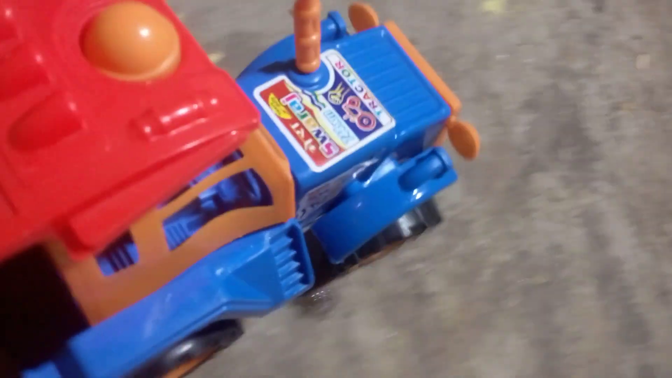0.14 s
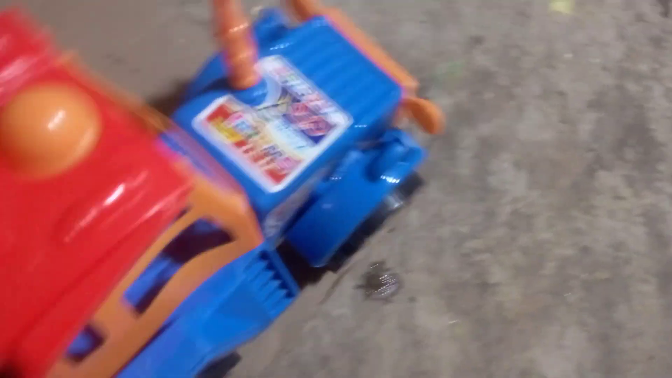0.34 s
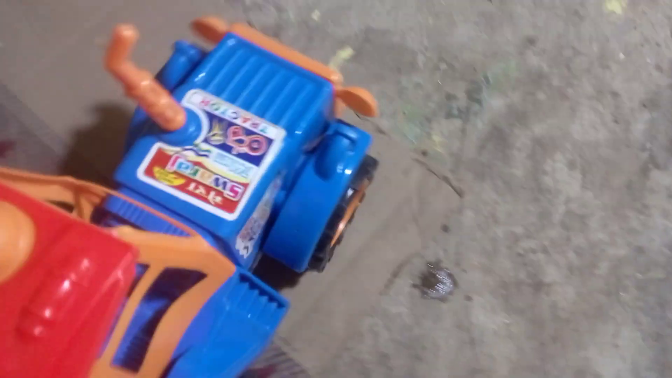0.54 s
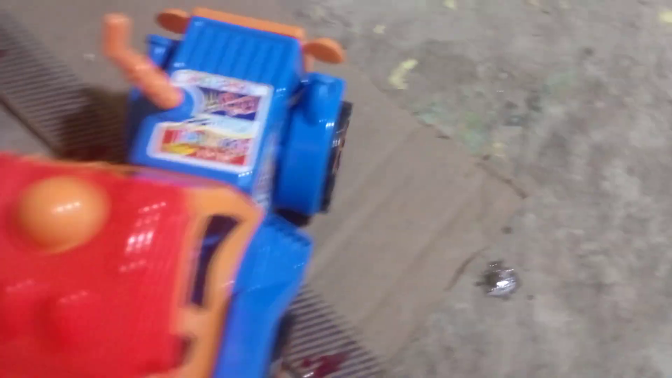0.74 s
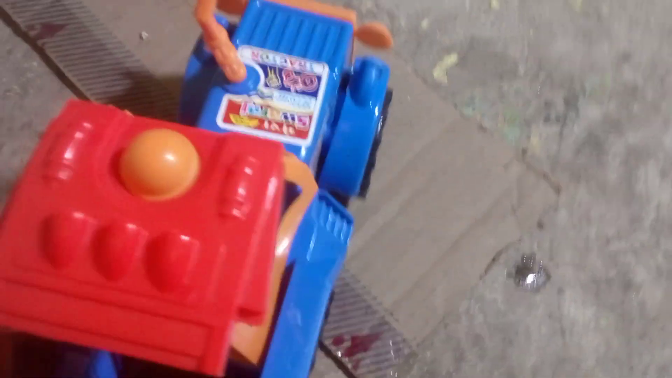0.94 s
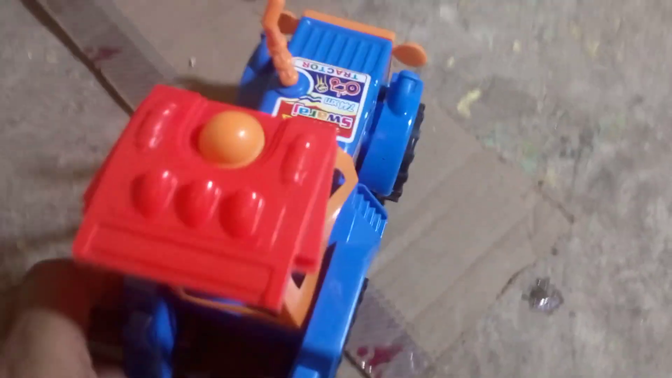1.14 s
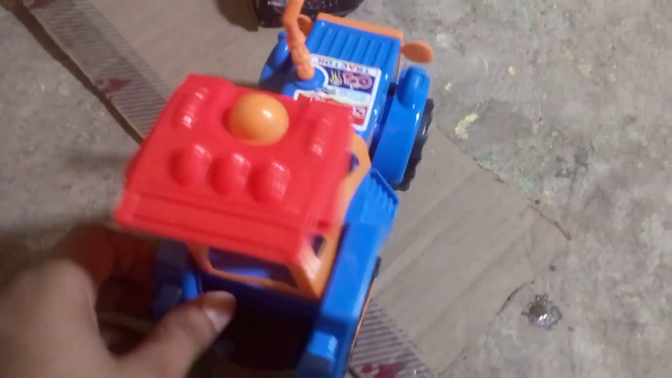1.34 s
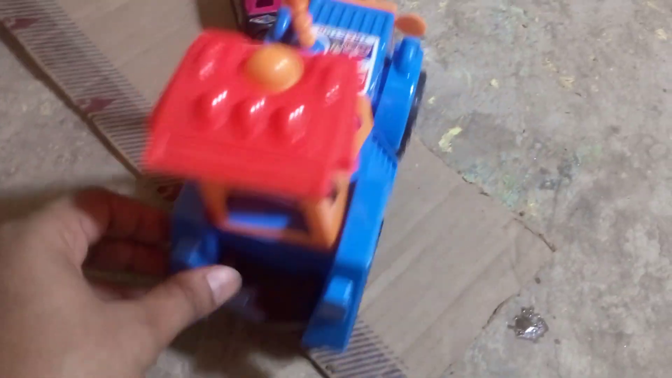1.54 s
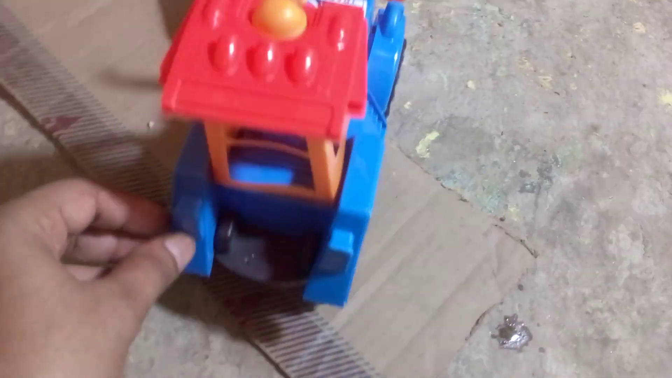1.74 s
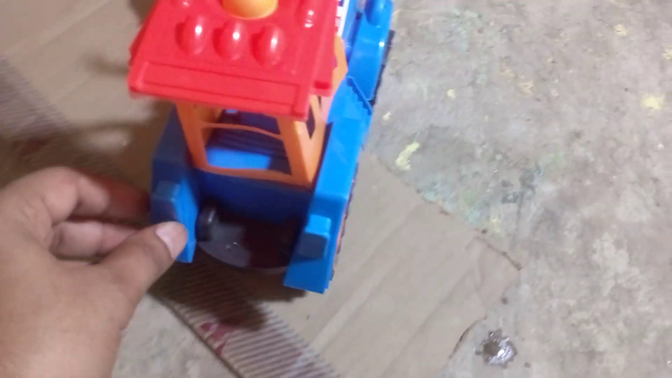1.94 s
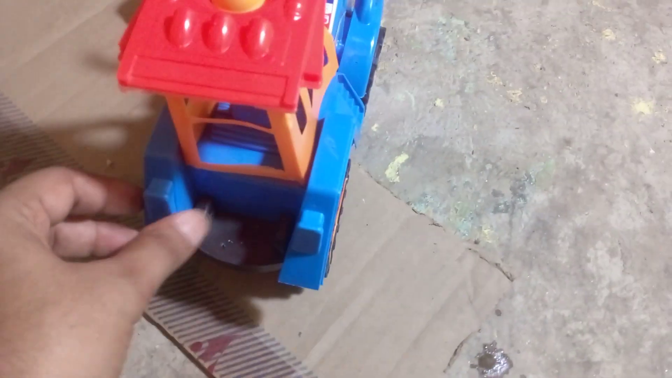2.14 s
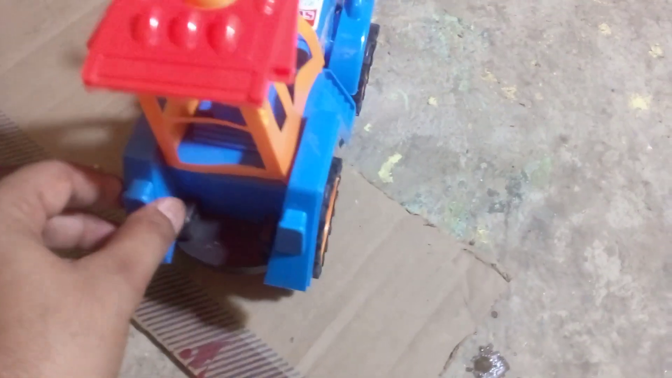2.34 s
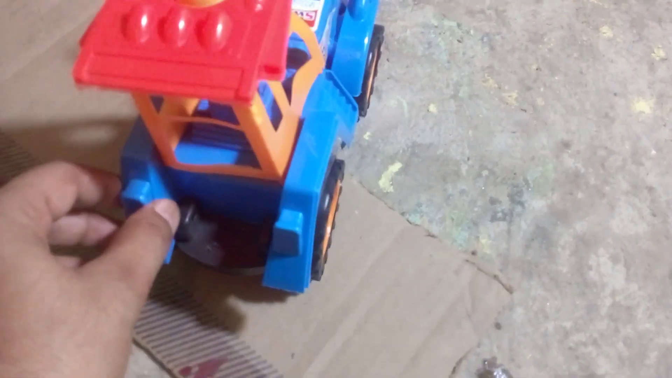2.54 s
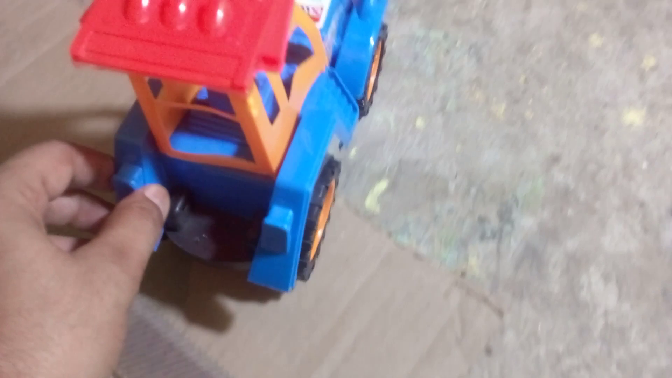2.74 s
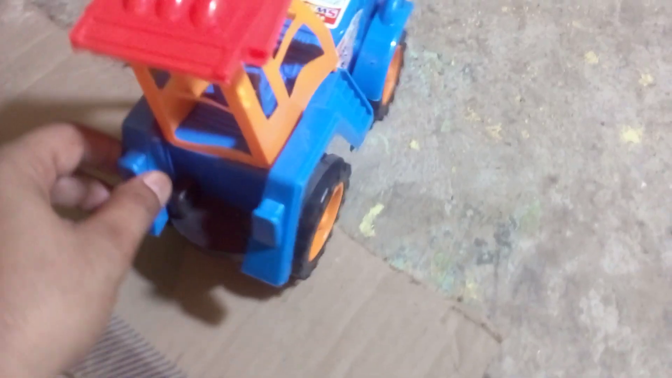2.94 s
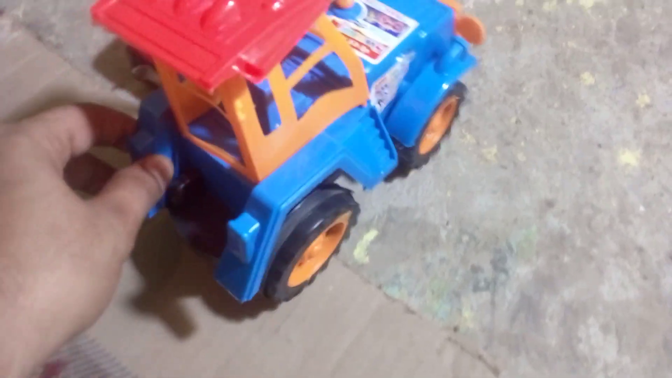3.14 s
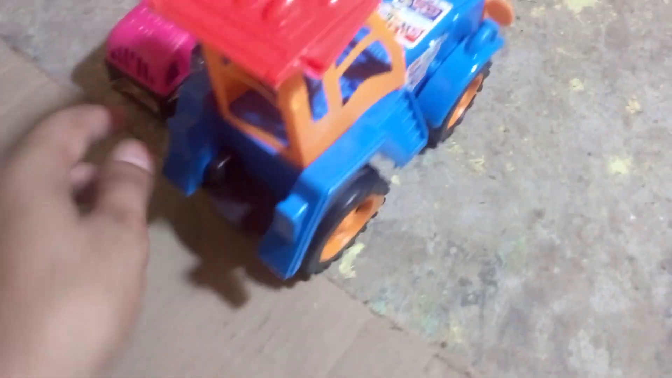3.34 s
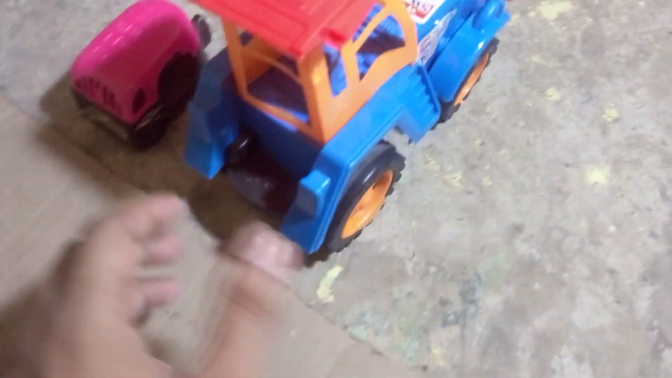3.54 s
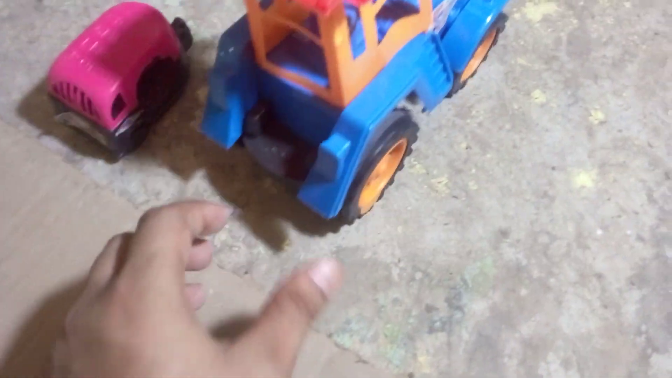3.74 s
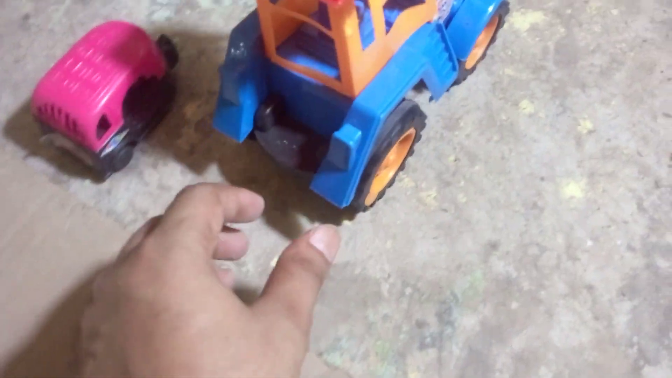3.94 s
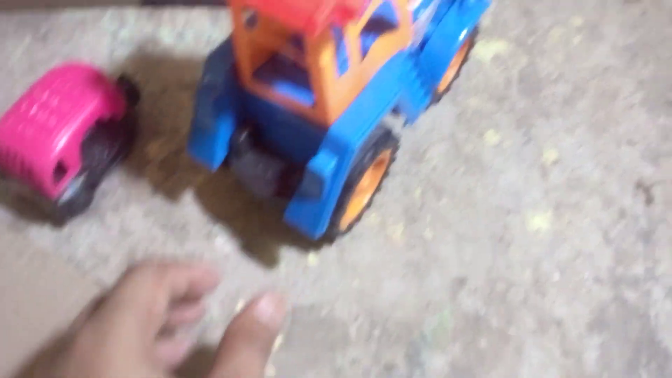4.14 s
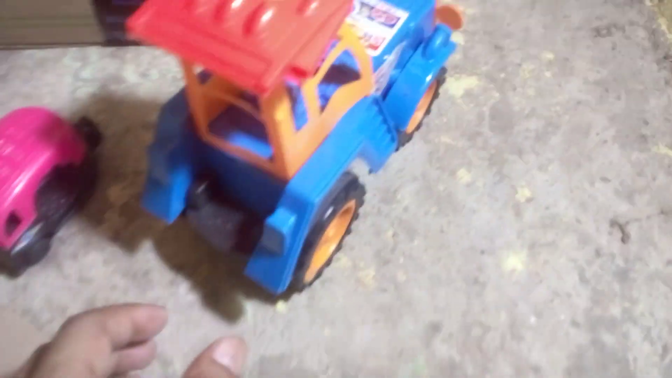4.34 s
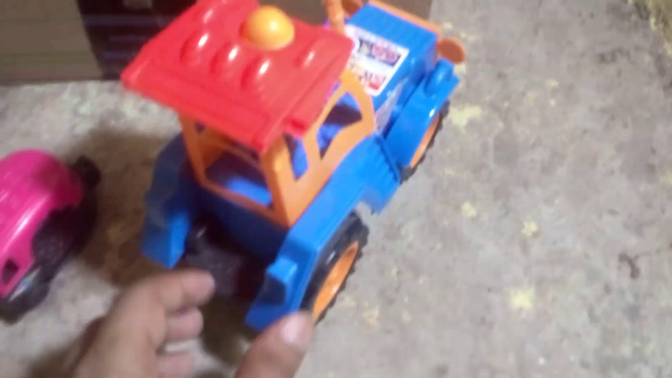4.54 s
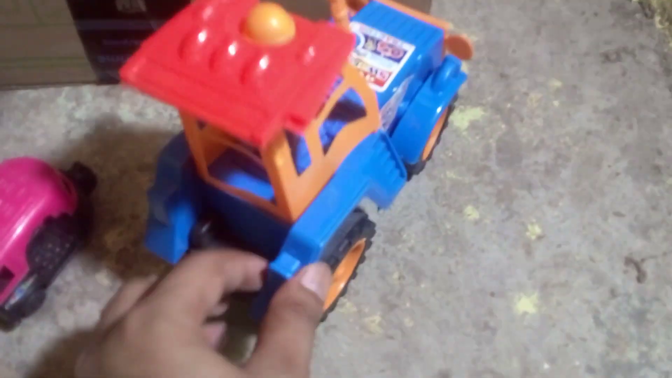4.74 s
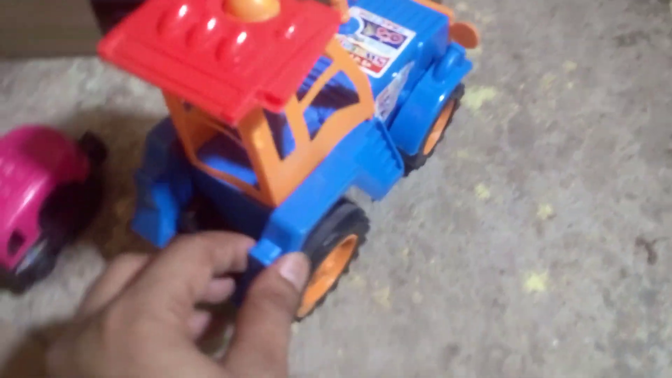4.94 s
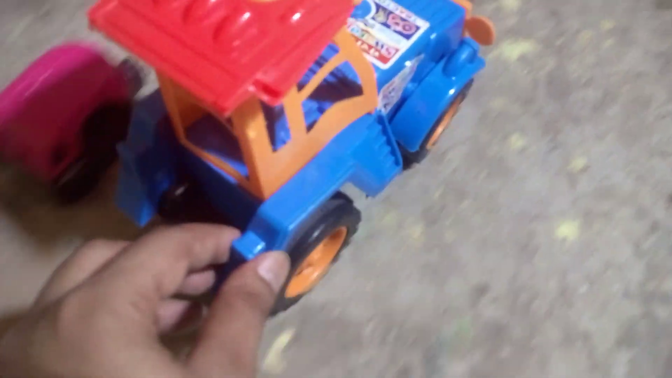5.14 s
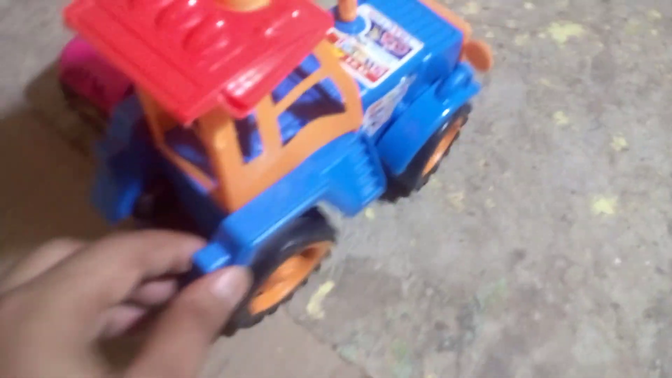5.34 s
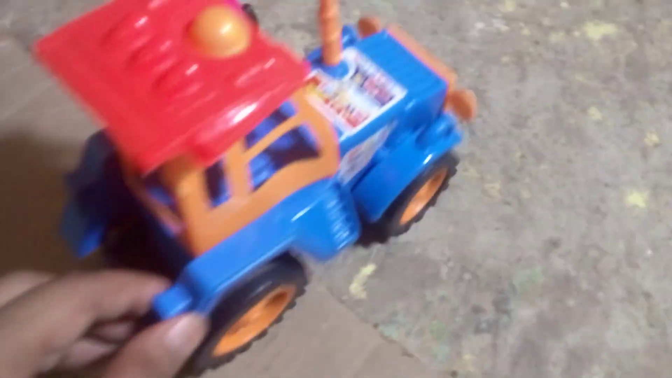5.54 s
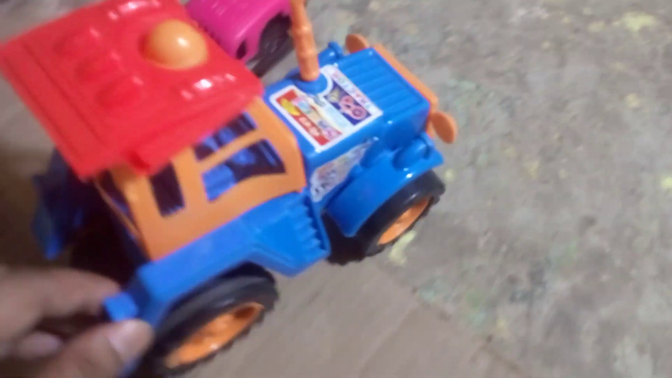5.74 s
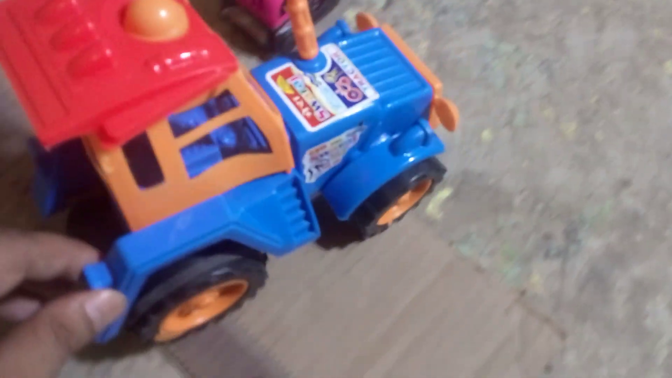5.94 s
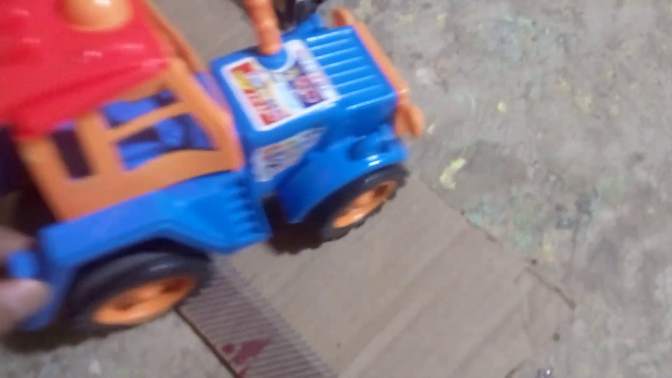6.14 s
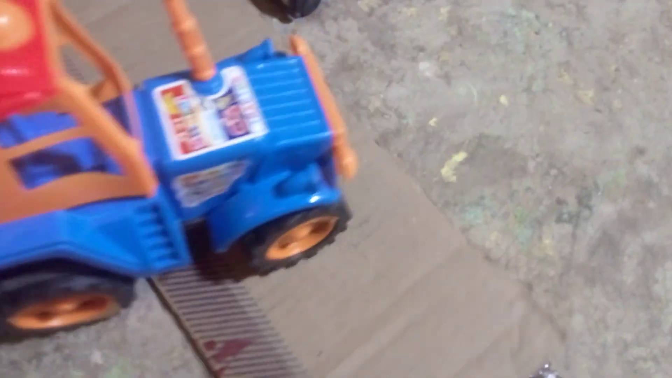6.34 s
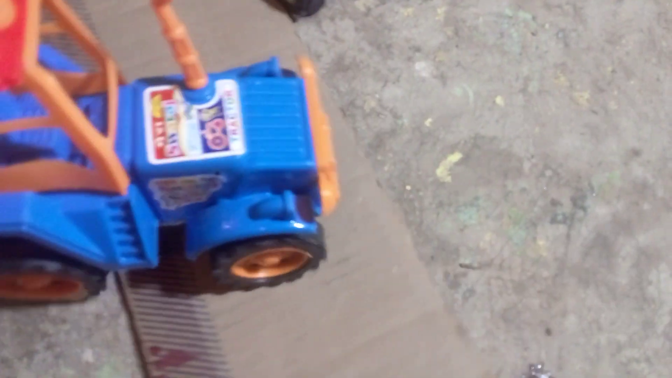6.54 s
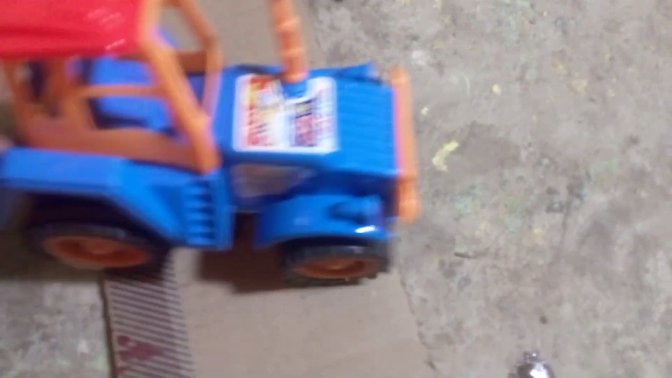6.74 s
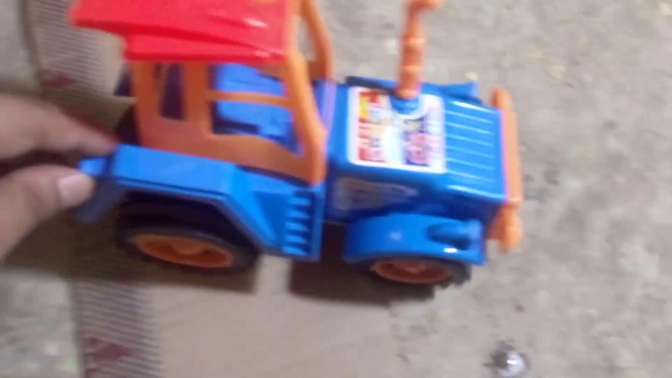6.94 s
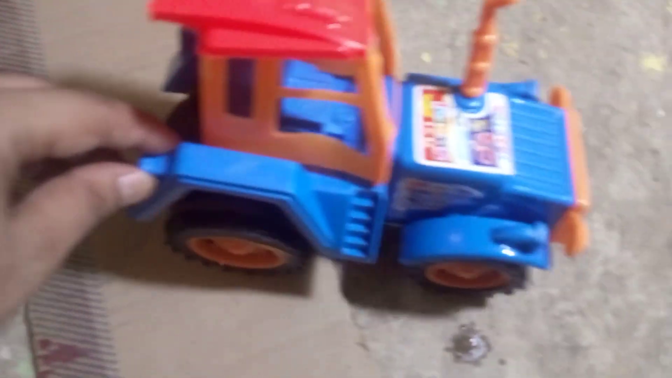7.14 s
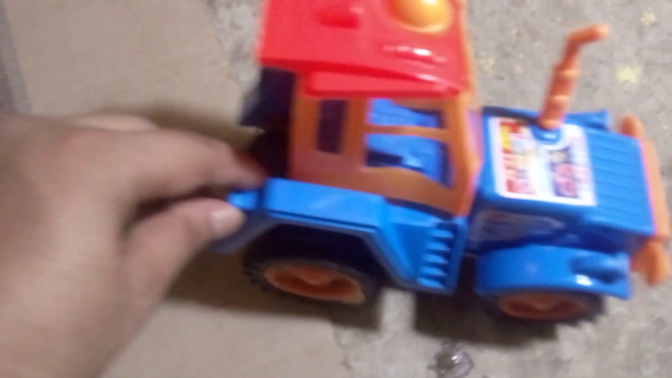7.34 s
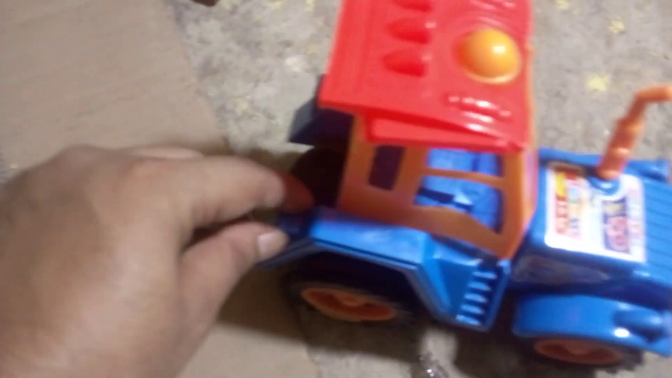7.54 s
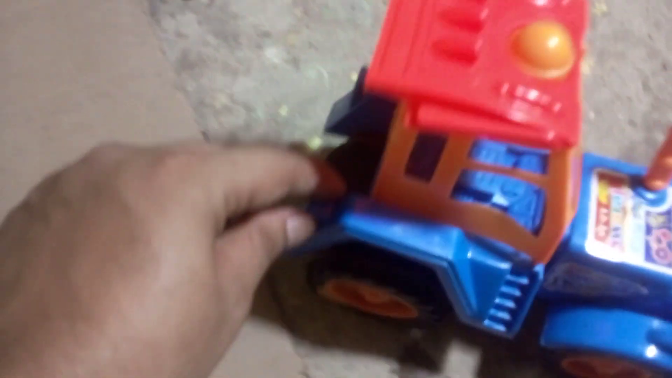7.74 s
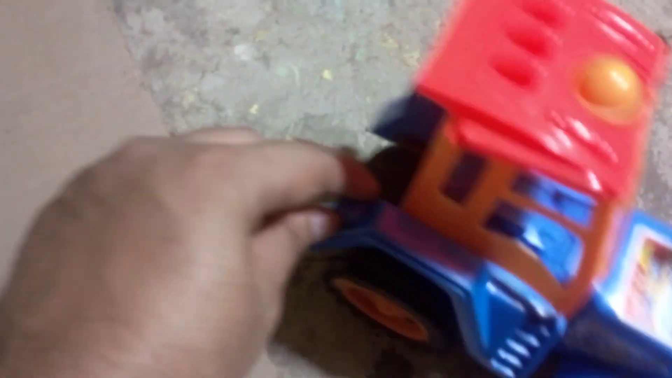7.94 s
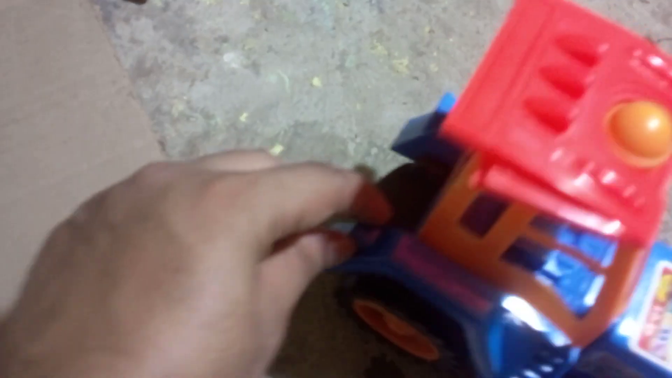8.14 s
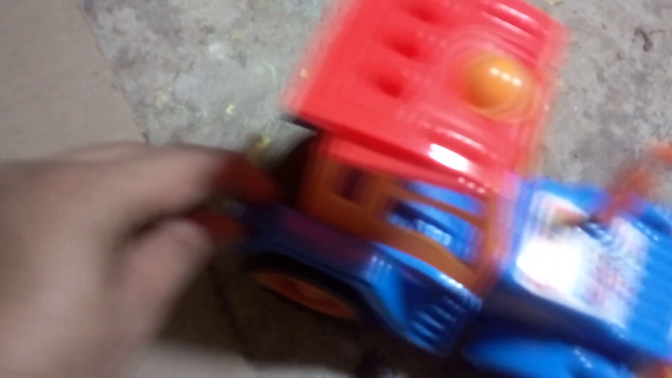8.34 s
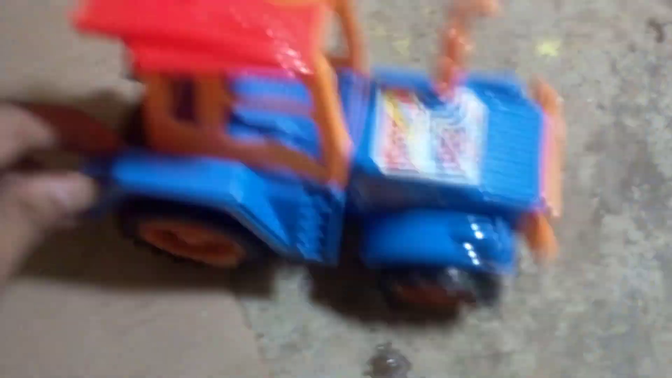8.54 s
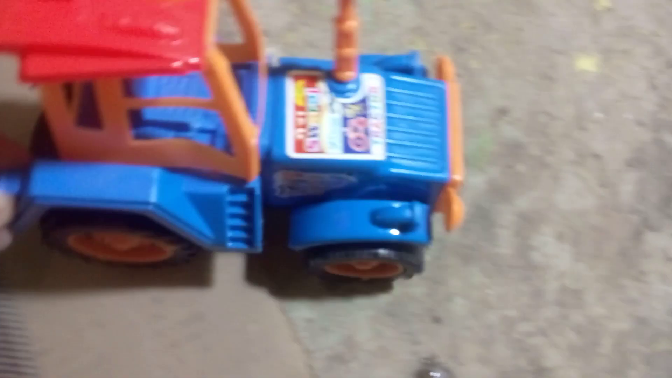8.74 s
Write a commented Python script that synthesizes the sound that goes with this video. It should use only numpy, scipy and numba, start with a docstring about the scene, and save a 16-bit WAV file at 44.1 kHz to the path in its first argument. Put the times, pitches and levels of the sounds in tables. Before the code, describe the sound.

A hollow plastic toy tractor is pushed in fits over rough concrete, close to the microphone in a small hard room with a short echo. From 0 to 0.7 s it rattles briskly, with a hard knock near 0.5, while an engine drones low outside, fading by about 2.3 s. Scattered knocks follow, with a rolling burst near 1.9 and lurching, hollow scrapes from 2.5 to 3.9. Movement thins to a lull from about 4.2; at 4.8 a palm thumps the shell softly and low. A bright grit crack and a cluster of knocks come around 5.3 to 5.8, another knock at 6.4, then fuller, boomier rolling from 6.7 to 7.9 as an engine drones again. A low room boom swells near 8.2 during a short easing, and strong clatter closes from 8.5 to 8.9. Dull air and a wavering motor hum persist.

```python
"""From the start a hollow plastic toy tractor is pushed in fits over rough concrete, heard from close by.
Grit jolts ring its wheels and shell as decaying modes; knocks, lurches and cracking grains punctuate it.
A small hard room answers throughout, under filtered-noise air and a sine hum that swells and sinks.
Engine notes, gliding sines, drone outside in the first seconds; after a lull near 4.8 s a palm thumps the toy.
Rolling returns, an engine drones again from about 6.6 s, and a low room boom swells near 8.2 s."""
import sys
import numpy as np
from scipy import signal
from scipy.fft import rfft, irfft, next_fast_len
from scipy.io import wavfile
from scipy.ndimage import uniform_filter1d
from numba import njit

SR = 44100
rng = np.random.default_rng(int(sys.argv[2]) if len(sys.argv) > 2 else 0)


def wrap_up_sound(samples):
    """Save the sound to the file named by the first command line argument, as 16-bit audio."""
    columns = np.atleast_2d(samples).T
    # keep every value between -1 and 1, then stretch to whole-number steps
    tamed = np.clip(columns, -1, 1)
    steps = np.round(tamed * 32767).astype(np.int16)
    wavfile.write(sys.argv[1], SR, steps)


def to_linear_factor(level_db):
    """Convert decibel levels (scalar or array-like) to linear amplitude factors."""
    exponent = np.asarray(level_db, float) / 20
    return 10 ** exponent


N = 391166
TIME = np.arange(N) / SR


def unit(x):
    """Normalization: scales a signal to rms 1."""
    return x / np.sqrt(np.mean(x ** 2))


def curves(table):
    """Linear interpolation: one value per sample of each column, with the end values held outside."""
    s, *columns = np.transpose(table)
    return [np.interp(TIME, s, c) for c in columns]


def walk(rate):
    """Slow random modulation: held noise, about rate values a second, smoothed twice to rms 1."""
    hold = int(SR / rate)
    steps = np.repeat(rng.standard_normal(N // hold + 1), hold)
    smooth = uniform_filter1d(uniform_filter1d(steps, hold), hold)
    return unit(smooth[:N])


def colour(x, points):
    """Spectral shaping: a filter through (frequency [Hz], gain [dB]), straight over log frequency."""
    hz, db = np.transpose(points)
    size = next_fast_len(N)
    f = np.maximum(np.arange(size // 2 + 1) * SR / size, 1)
    gain = to_linear_factor(np.interp(np.log(f), np.log(hz), db))
    return irfft(rfft(x, size) * gain, size)[:N]


def highpass(x, hz):
    """High-pass filtering: a steep fourth-order bass cut."""
    return signal.sosfilt(signal.butter(4, hz, "high", fs=SR, output="sos"), x)


# edges between the wheel, shell, panel and grit ranges: (frequency [Hz])
SPLIT_HZ = (1050., 2800., 6800.)


def split(x, k):
    """Complementary band-splitting: range k of the four, lowest first; the ranges sum to x."""
    def above(j):
        if j == 0:
            return x
        if j > len(SPLIT_HZ):
            return 0
        # filtered forth and back, so that the differences cancel cleanly
        forth = highpass(x, SPLIT_HZ[j - 1])
        return highpass(forth[::-1], SPLIT_HZ[j - 1])[::-1]
    return above(k) - above(k + 1)


def impulses(s, size):
    """Impulsive excitation: clicks of given sizes at given times."""
    return np.bincount(np.clip((s * SR).astype(int), 0, N - 1), size, N)


def burst(x, decay_s):
    """Exponential decay: each click becomes a short puff of noise."""
    envelope = signal.lfilter([1], [1, -np.exp(-1 / (decay_s * SR))], np.abs(x))
    return envelope * rng.standard_normal(N)


@njit
def glide(x, hz, r):
    """Damped resonance: a rotating, shrinking phasor whose pitch may move on every sample."""
    y, z = np.empty(len(x)), 0j
    for i in range(len(x)):
        z = z * r * np.exp(2j * np.pi * hz[i] / SR) + x[i] + 1e-18
        y[i] = z.imag
    return y


def ring(x, hz, t60, wander=0.):
    """Modal ringing: an impulse of 1 starts a sine of peak 1; pitch wanders as load and contact shift."""
    return glide(x, hz * (1 + wander * walk(14)), np.exp(-np.log(1000) / (t60 * SR)))


def tone(hz, db):
    """Phase accumulation: a sine on a moving pitch, level in dB rms."""
    return np.sqrt(2) * to_linear_factor(db) * np.sin(2 * np.pi * (np.cumsum(hz) / SR + rng.uniform()))


# spectrum of the steady background air: (frequency [Hz], relative density [dB per Hz])
AIR = [(24, -43), (40, -17), (101, -19.5), (130, -22.5), (249, -35.5), (276, -30.5), (1680, -46),
       (16000, -77)]


def air():
    """Broadband noise: random noise shaped by a falling spectrum, its level drifting gently."""
    level_db = -44.5 + 1.0 * walk(3.69)
    return to_linear_factor(level_db) * unit(colour(rng.standard_normal(N), AIR))


# room boom stirred by the traffic: (time [s], level before wavering [dB])
BOOM = [(0, -47), (5, -50.5), (7.8, -48.5), (8.2, -39.5), (8.87, -46)]


def boom():
    """Low room resonance: a sine near 96.5 Hz that wavers in pitch and level."""
    hz = 96.5 * (1 + 0.013 * walk(5.5))
    level_db, = curves(BOOM)
    return tone(hz, level_db + 4.23 * walk(7.6))


# engines outside, one table each: (time [s], pitch [Hz], level before wavering [dB])
ENGINES = [
    [(0, 73.7, -34), (.35, 74, -32.5), (.75, 75, -43), (2.1, 71.05, -43.5)],
    [(.8, 58, -42), (1.2, 65.06, -41.5), (2.3, 65.5, -46)],
    [(6.7, 58, -44), (7.1, 61.6, -43.5), (7.9, 66.4, -35.5), (8.35, 64.9, -40), (8.87, 66.2, -49)],
]


def engines():
    """Harmonic radiation: low engine notes with their octaves get through the walls."""
    out = 0
    for table in ENGINES:
        hz, db = curves(table)
        start_s, end_s = table[0][0], table[-1][0]
        fade = np.clip(np.minimum(TIME - start_s, end_s - TIME) / 0.14 + 1, 0, 1)
        db = db + 1.3 * walk(10.0)
        out = out + fade * (tone(hz, db) + tone(2 * hz, db - 13))
    return out


# motor hum: (time [s], level of the fundamental [dB])
HUM = [(0, -42), (1.9, -55), (2.8, -42), (4.4, -52), (5.9, -40), (8.87, -49)]


def hum():
    """Periodic vibration: a motor nearby hums on a steady fundamental and a weaker octave."""
    hz = np.full(N, 53.6)
    level_db, = curves(HUM)
    return tone(hz, level_db) + tone(2 * hz, level_db - 13.0)


# hand meets the toy: (level [dB], frequency [Hz], t60 [s]) of the lowest mode
THUD = (-19.5, 136, 0.071)


def thud():
    """Cavity resonance: a soft palm makes contact twice and thumps the hollow toy low and short."""
    db, hz, t60 = THUD
    start_s = 4.826
    push = impulses(np.array([start_s, start_s + 0.017]), to_linear_factor([db - 8, db]))
    low = ring(push, hz, t60)
    upper = to_linear_factor(-4.0) * ring(push, 3.7 * hz, t60 / 2)
    middle = to_linear_factor(-7.0) * ring(push, 2.57 * hz, t60 / 2)
    return low + upper + middle


# grit cracking under a wheel: (time [s], puff level before band-splitting [dB])
TICKS = [(0.2075, -30), (0.595, -21), (1.181, -24), (1.7585, -24.5), (3.428, -26), (3.9374, -29.5),
         (4.839, -22), (5.378, -15.5), (6.4664, -23.5), (6.564, -26), (6.828, -26), (7.9605, -29.5)]


def ticks():
    """Brittle fracture: single grains crack in a bright puff with a little of the panels in it."""
    s, db = np.transpose(TICKS)
    puff = burst(impulses(s, to_linear_factor(db)), 0.0037)
    grit = len(SPLIT_HZ)
    return split(puff, grit) + to_linear_factor(-1) * split(puff, grit - 1)


# lowest modes of the wheels: (frequency [Hz], relative level [dB], undamped t60 [s])
WHEELS = [(590, -17, 0.033), (682, -6, 0.056), (831, -5, 0.047), (927, -8, 0.074)]
# modes of the shell: (frequency [Hz], relative level [dB], undamped t60 [s])
SHELL = [(1176.6, -2, 0.055), (1250, 0, 0.029), (1310, -1.5, 0.06), (1590, 3, 0.018), (2134, -5, 0.042),
         (2544, 5, 0.01), (2746, -6.5, 0.053), (3030, 6.5, 0.012), (3510, 1, 0.015), (3985, -1.5, 0.019)]
# filter for plastic on grit, in knocks and rolling: (frequency [Hz], gain [dB])
SCRAPE = [(200, -25.5), (520, -42), (650, -14), (1020, -14.5), (1260, -11.5), (1900, -9.5), (4190, -11.5),
          (5800, -17), (7060, -33.5), (10500, -26.5), (15500, -30.5)]
# knocks, which also start rattles in the rolling: (time [s], relative peak [dB], strongest ring [Hz])
KNOCKS = [(0.135, 1.5, 1870), (0.317, 2.5, 1480), (0.331, -4.5, 1470), (0.481, 8.5, 1240), (0.5, -3, 1310),
          (0.635, 1.5, 1470), (0.677, -8.5, 4030), (0.87, -16.5, 2023), (0.998, -15, 2320),
          (1.135, -4, 1190), (1.338, -5, 1300), (1.523, -4.5, 1330), (1.691, -0.5, 1380),
          (1.831, -2.5, 1280), (1.952, -8.5, 1000), (2.119, -13.5, 2640), (2.513, -4.5, 1750),
          (2.68, -11.5, 1300), (2.706, -10.5, 1340), (2.727, -10, 1300), (2.987, -3.5, 1250),
          (3.017, -7.5, 1350), (3.06, -9, 1250), (3.232, -9.5, 1200), (3.269, -5, 1270), (3.348, 0, 1300),
          (3.712, -7.5, 1670), (3.857, -2.5, 1330), (4.098, -16, 1320), (4.144, -10.5, 1470),
          (4.167, -11, 1470), (4.208, -15.5, 1650), (4.36, -25, 3500), (4.805, -30, 2940),
          (4.943, -10.5, 2570), (5.329, -1, 2750), (5.346, -1, 1310), (5.353, 0, 1310), (5.453, -7.5, 1310),
          (5.612, 1, 1300), (5.817, 2.5, 1250), (5.84, -2.5, 690), (6.39, 0.5, 700), (6.526, -10.5, 2500),
          (6.546, -11, 3950), (6.75, -7.5, 4150), (7.115, 0, 945), (7.153, -5.5, 1290), (7.306, -11, 2400),
          (7.417, -3, 1200), (7.613, -4, 1200), (7.758, -7.5, 1740), (7.791, -1, 2490), (7.934, -2.5, 1840),
          (8.133, -8.5, 2250), (8.164, -10.5, 1700), (8.314, -16.5, 2080), (8.606, 2.5, 1440),
          (8.644, 5, 1780), (8.652, 5.5, 1590), (8.668, 1.5, 1590), (8.826, 4, 1680), (8.836, 2.5, 1400)]


def knocks():
    """Impact excitation: a quick run of contacts, the second mostly hardest, rings modes near the struck one."""
    s, peak_db, struck_hz = np.transpose(KNOCKS)
    modes, bounce = WHEELS + SHELL, np.arange(4)
    gap = rng.standard_normal((len(s), len(bounce)))
    scatter = rng.standard_normal((len(s), len(bounce)))
    mix = rng.standard_normal((len(s), len(modes)))
    delay_s = np.cumsum((np.abs(gap) * 0.0015 + 0.0015) * (bounce > 0), axis=1)
    size = to_linear_factor(peak_db[:, None] - 6.1 * np.abs(bounce - 1) + 1.34 * scatter)
    times = (s[:, None] + delay_s).ravel()

    out = 0
    for k, (hz, db, t60) in enumerate(modes):
        near_db = -19.0 * np.abs(np.log2(hz / struck_hz)) + 1.54 * mix[:, k]
        gain = (-1) ** k * to_linear_factor(db + near_db - 15.5)
        hits = impulses(times, (size * gain[:, None]).ravel())
        out = out + ring(hits, hz, 0.72 * t60, wander=0.021)  # the floor damps the blow

    # the crack is duller or brighter with the struck part
    crack = 0
    for k, hz in enumerate(np.array(SPLIT_HZ) / np.sqrt(2)):
        near = to_linear_factor(-8.0 * np.abs(np.log2(hz / struck_hz)))
        puff = burst(impulses(times, (size * near[:, None]).ravel()), 0.002)
        crack = crack + split(puff, k)
    click = split(burst(impulses(times, size.ravel()), 0.0013), len(SPLIT_HZ))
    return out + to_linear_factor(8.0) * colour(crack, SCRAPE) + to_linear_factor(-23.0) * click


# steady rolling: (time [s], relative level [dB])
ROLL = [(0, -32.5), (.5, -24), (.78, -30.5), (1.1, -49.5), (1.83, -35), (1.88, -26.5), (2.1, -32),
        (2.38, -66), (2.9, -40.5), (3.25, -29), (3.74, -49), (3.84, -54), (4.45, -57.5), (4.77, -79),
        (5.05, -40), (6.2, -40.5), (6.85, -30.5), (7.5, -31.5), (8.26, -52.5), (8.47, -24.5), (8.87, -28.5)]
# lurches, a tread lug catches and the loose parts rattle: (start [s], relative level [dB], held [s])
LURCHES = [(0, -19.5, 0.011), (1.53, -38.5, 0.096), (1.69, -32, 0.089), (2.415, -44.5, .08),
           (2.676, -32.5, 0.11), (3.012, -28.5, 0.043), (3.104, -28.5, 0.14), (3.419, -26, 0.023),
           (3.506, -29.5, 0.022), (3.605, -27, 0.038), (3.858, -36, 0.1), (4.079, -31, 0.026),
           (4.786, -30, 0.083), (5.187, -31.5, 0.17), (5.585, -27, 0.038), (5.95, -28, 0.053),
           (6.671, -27, 0.15), (6.82, -24, 0.079), (7.061, -27, 0.07), (7.769, -35, 0.061)]


def motion_db():
    """Envelope maximum: steady rolling or the strongest lurch or rattle, which rises fast, holds and falls."""
    rise_db_per_s, fall_db_per_s = 2000, 215
    # loose parts rattle on after each knock, 26 dB under its tabled peak
    rattles = [(s, peak_db - 26, .02) for s, peak_db, _ in KNOCKS]
    level_db, = curves(ROLL)
    for s, db, held in LURCHES + rattles:
        rise = rise_db_per_s * np.maximum(s - TIME, 0)
        fall = fall_db_per_s * np.maximum(TIME - s - held, 0)
        level_db = np.maximum(level_db, db - rise - fall)
    return level_db


# colour of the rolling against its middle range:
# (time [s], wheel boom [dB], hollow ring of the cab [dB], panels [dB], grit crackle [dB])
LOAD = [(0, -3.5, 1, -5, -11), (.9, -4.5, 0, -9, -13.5), (1.6, -1.5, 3, -5, -10), (2.0, -6.5, -2, -14, -18),
        (2.7, -2.5, 5, -8.5, -17), (3.4, -3, 6, -2.5, -8), (4.2, -6.5, 1.5, -10, -19),
        (4.85, -7.5, -3.5, -10.5, -9), (5.5, 0, 7.5, 1.5, -6), (6.2, -3.5, -2.5, -7, -14),
        (7.0, 1, -1, -5, -12.5), (7.5, 5.5, 3.5, -7, -10), (8.1, 1.5, -6, -2.5, -13),
        (8.6, -1, 2.5, -5, -10)]


def rolling():
    """Stochastic excitation: about a thousand grit jolts a second ring the modes in a drifting mix."""
    level_db = motion_db()
    boom_db, cab_db, panel_db, grit_db = curves(LOAD)
    count = 9000
    s = rng.uniform(0, N / SR, count)
    at = (s * SR).astype(int)
    # most grains are small, a few large; the rattle comes in clumps
    clump_db = 2.15 * walk(40)
    grain = to_linear_factor(np.minimum(2.74 * rng.exponential(size=count), 8) + clump_db[at])
    jolt = to_linear_factor(level_db[at]) * grain / np.sqrt(np.mean(grain ** 2) * count / N)

    def ringing(modes, size):
        """Modal superposition: each mode takes its own drifting share of every jolt."""
        total = 0
        for hz, db, t60 in modes:
            share = to_linear_factor(3.1 * walk(11)[at]) * rng.standard_normal(count)
            total = total + to_linear_factor(db) * ring(impulses(s, size * share), hz, t60, wander=0.032)
        return total

    cab_modes = 3  # the lowest modes of the shell belong to the cab
    cab = ringing(SHELL[:cab_modes], jolt * to_linear_factor(cab_db[at]))
    body = ringing(SHELL[cab_modes:], jolt)
    wheels = ringing(WHEELS, jolt * to_linear_factor(boom_db[at]))
    out = to_linear_factor(-32.5) * (cab + body) + to_linear_factor(-27.5) * wheels

    # each range has its own share of every grain, and rubs with its own flicker
    ranges = [(boom_db, 11, -6), (0, 5, -10), (panel_db, 9, -4), (grit_db, 10, 5)]
    for k, (load_db, rub_db, tick_db) in enumerate(ranges):
        share = to_linear_factor(tick_db + 5.0 * rng.standard_normal(count))
        crackle = burst(impulses(s, jolt * share), 0.0015)
        rub = to_linear_factor(level_db + clump_db + rub_db + 2.0 * walk(14)) * rng.standard_normal(N)
        out = out + colour(to_linear_factor(load_db) * split(crackle + rub, k), SCRAPE)
    return out


def room(toy):
    """Reverberation: convolution with exponentially decaying noise gives the echo off the walls."""
    t60_s, level_db = 0.82, -10
    t = TIME[TIME < 2 * t60_s]
    decay = np.exp(-np.log(1000) * t / t60_s)
    tail = rng.standard_normal(len(t)) * decay * (t > .004)  # the first 4 ms are silent
    return to_linear_factor(level_db) * signal.fftconvolve(toy, tail / np.sqrt(np.sum(tail ** 2)))[:N]


def scene():
    """Superposition: the background, the toy and its echo add."""
    background = air() + boom() + engines() + hum()
    toy = thud() + ticks() + knocks() + rolling()
    return (background + toy + room(toy))[None]


def top_cut(x):
    """Nothing passes above the cut-off."""
    return signal.sosfilt(signal.butter(12, 16600, fs=SR, output="sos"), x)


def record(dry):
    """Band-limiting and saturation: cuts the deepest bass, rounds the loudest peaks and cuts the top."""
    ceiling = 1.3
    rounded = ceiling * np.tanh(highpass(dry, 51.0) / ceiling)
    treble_cut = signal.ellip(8, .2, 60, 15900, fs=SR, output="sos")
    mix = signal.sosfilt(treble_cut, rounded)
    return top_cut(mix)


dry = scene()
out = record(dry)
wrap_up_sound(out)
```